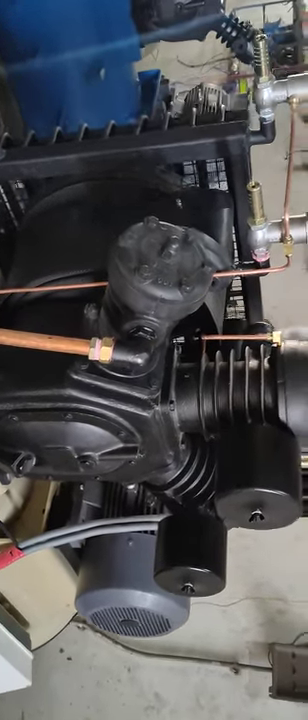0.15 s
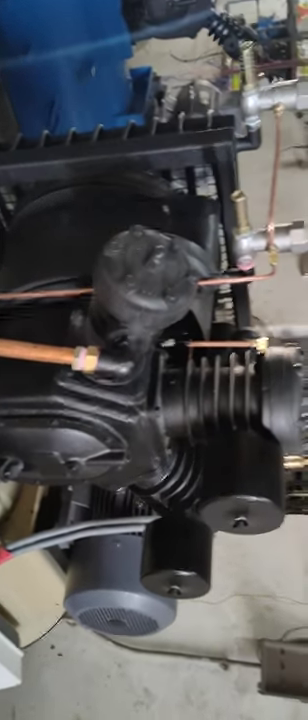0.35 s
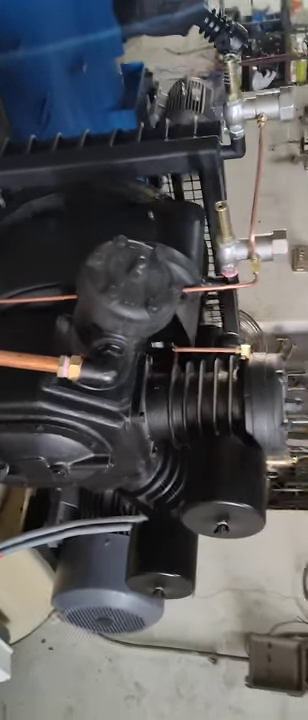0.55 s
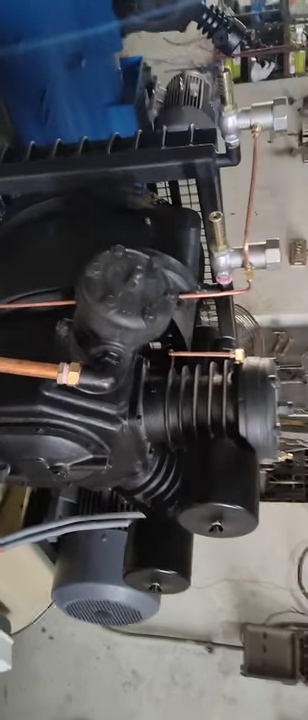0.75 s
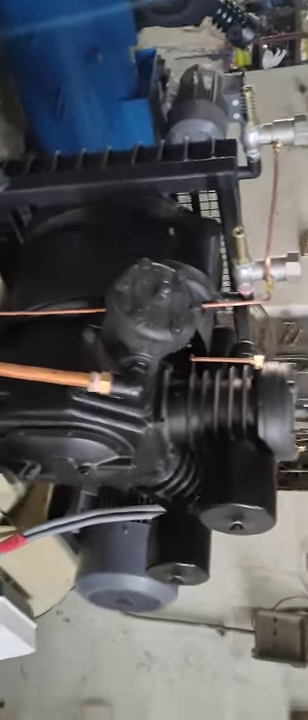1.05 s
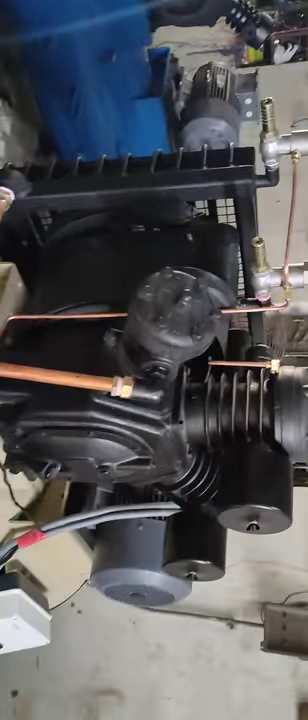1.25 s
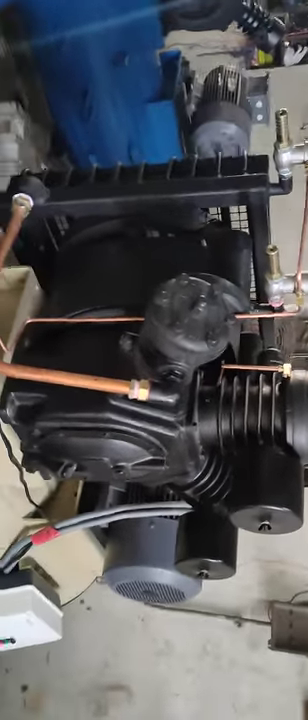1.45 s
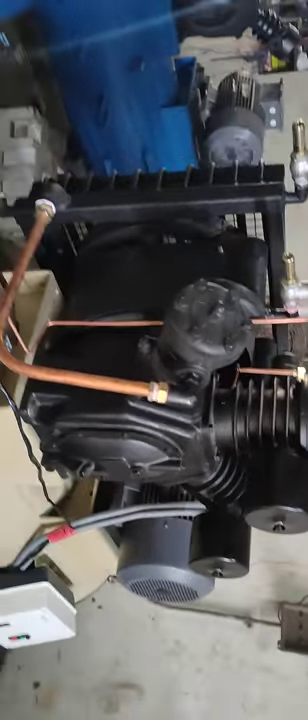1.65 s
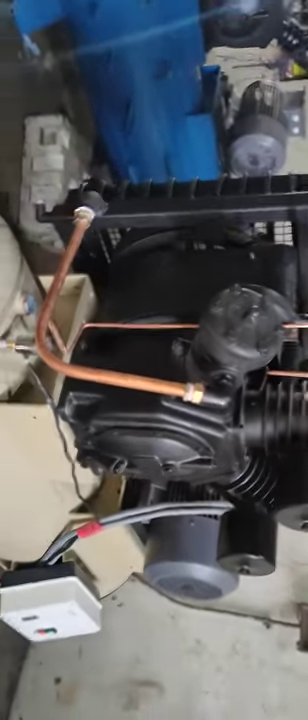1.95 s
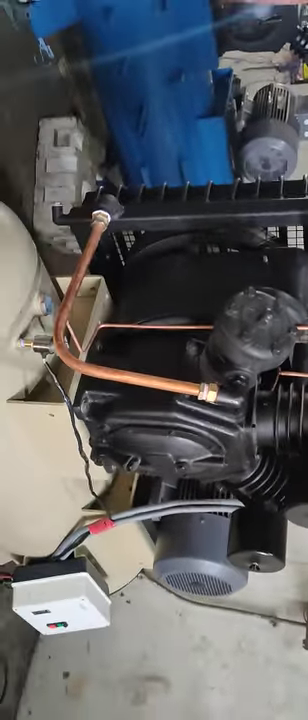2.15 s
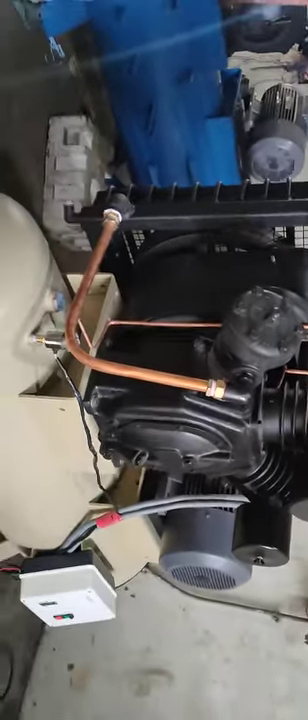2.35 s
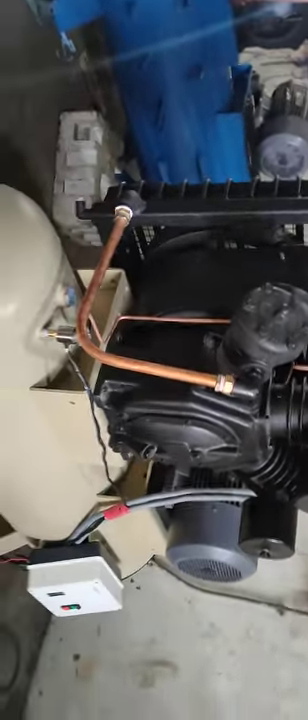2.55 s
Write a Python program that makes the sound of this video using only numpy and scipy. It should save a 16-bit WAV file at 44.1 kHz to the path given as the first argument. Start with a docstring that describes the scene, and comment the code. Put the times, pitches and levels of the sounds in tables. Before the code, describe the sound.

A piston air compressor runs steadily in a workshop, with a fast pulsing drone, metallic clatter and ticking valves. Halfway through, a steady, half-whistling hiss of air comes in. The microphone moves close over the machine.

```python
"""A workshop, where a belt-driven piston air compressor runs steadily, heard from a microphone moving
over its heads. Every turn of the crank repeats the rolling drone of the gulping intakes, the clatter of
the crankcase and the spit and tick of the valves. Early on, the clatter briefly turns raspy. Halfway
through, a steady, half-whistling hiss of rushing air comes in and half covers the valves."""
import sys
import numpy as np
from scipy.fft import rfft, irfft, next_fast_len
from scipy.io import wavfile
from scipy.ndimage import map_coordinates

SR = 44100
rng = np.random.default_rng(int(sys.argv[2]) if len(sys.argv) > 2 else 0)


def to_wav(s):
    """Save 16-bit WAV."""
    ch = np.atleast_2d(s).T  # columns
    pcm = np.round(np.clip(ch, -1, 1) * 32767)  # PCM
    wavfile.write(sys.argv[1], SR, pcm.astype(np.int16))


N = 119070
CRANK_HZ = 14.056


def crank(unsteady_turns):
    """Crank angle in turns; the belt lets it waver very slightly."""
    return np.arange(N) / SR * CRANK_HZ + unsteady_turns * wobble(4.6)


# When the microphone reaches each of its five positions, in seconds.
MIC_TIMES = [.3, .85, 1.4, 1.9, 2.45]
# The drone's harmonics. Each row: multiple of the crank rate, then level in dB at each position.
DRONE_HARMONICS = [(12, -61, -59, -60, -64, -68), (13, -63, -61, -62, -65, -65),
                   (19, -51, -48, -46, -48, -55), (22, -40, -38, -38, -40, -41),
                   (23, -34, -31, -31, -32, -36), (24, -41, -41, -40, -42, -47),
                   (25, -33, -33, -56, -48, -45), (26, -41, -41, -44, -44, -51),
                   (27, -49, -47, -53, -44, -51), (28, -41, -39, -39, -43, -51),
                   (29, -36, -40, -38, -35, -33), (30, -51, -43, -43, -43, -45),
                   (31, -39, -47, -45, -41, -39), (32, -38, -40, -44, -51, -44),
                   (42, -42, -43, -46, -47, -49), (43, -40, -39, -43, -48, -46),
                   (49, -41, -46, -51, -47, -46), (50, -44, -51, -37, -40, -52),
                   (51, -49, -45, -41, -42, -44), (53, -49, -43, -43, -56, -56),
                   (54, -45, -45, -50, -48, -47), (55, -45, -40, -48, -50, -56),
                   (56, -46, -56, -41, -46, -43), (61, -44, -47, -56, -51, -52),
                   (68, -50, -52, -54, -46, -53), (70, -46, -47, -45, -51, -49),
                   (77, -56, -47, -46, -48, -51), (85, -54, -49, -44, -45, -56)]
def intake_drone(turns, waver_db, intake_top_hz):
    """Intakes sound the low harmonics, the housing the high; the balance shifts as the microphone moves."""
    rows = np.array(DRONE_HARMONICS, float)
    multiples, gains = np.round(rows[:, 0]), amp(rows[:, 1:])
    intake = multiples * CRANK_HZ < intake_top_hz
    shifts = housing_phases(multiples, spread_rad=.9) + np.zeros(len(MIC_TIMES))
    shifts[intake] = gulping_phases(multiples[intake], gains[intake], count=200)
    out = np.zeros((2, N))
    for multiple, gain, shift in zip(multiples, gains, shifts):
        phase = 2 * np.pi * multiple * turns + curve(list(zip(MIC_TIMES, shift)))
        level = np.sqrt(2) * curve(list(zip(MIC_TIMES, gain))) * amp(waver_db * wobble(3.83))
        width = amp(along(STEREO_WIDTH, multiple * CRANK_HZ))
        side = width * rng.choice([-1, 1]) * np.sin(phase + .42 * wobble(.45))
        out += level * (np.cos(phase) + np.outer([1, -1], side))
    return out


# Gulps of air. Each row: crank angle in turns, strength at the first microphone position, at the last.
GULPS = [(.16, .8, .9), (.29, .75, .7), (.41, .55, .8), (.56, 1.25, .7), (.74, 1.6, 1), (.97, .75, 1.6)]
def gulping_phases(multiples, gains, count, gulp_turns=.052, rest=.3):
    """Random phases, nudged at each microphone position until the drone swells with the intakes' gulps."""
    turn = np.arange(count) / count
    waves = np.exp(2j * np.pi * np.outer(multiples, turn))
    candidates = rng.uniform(0, 2 * np.pi, (count, len(multiples)))
    path, score = [], 0
    for gain, moved in zip(gains.T, np.linspace(0, 1, len(MIC_TIMES))):
        gulps = rest
        for angle, first, last in GULPS:
            offset = (turn - angle + .5) % 1 - .5
            gulps = gulps + (first + moved * (last - first)) * bell(offset, gulp_turns)
        for _ in range(20):
            drone = gain * np.exp(1j * candidates) @ waves
            swelling = gulps * np.exp(1j * np.angle(drone))
            candidates = np.angle(swelling @ waves.conj().T)
        path.append(candidates)
        score = score + np.abs(drone) @ gulps
    return np.unwrap(np.array(path)[:, np.argmax(score)].T)


def housing_phases(multiples, spread_rad):
    """Neighbouring harmonics share one housing resonance, struck once a turn at its own crank angle."""
    resonance = np.cumsum(np.diff(multiples, prepend=multiples[0]) > 1)
    angle = rng.random(len(multiples))[resonance]
    return (rng.normal(0, spread_rad, len(multiples)) - 2 * np.pi * multiples * angle)[:, None]


# The body of the crankcase and fins. Each row: frequency in Hz, relative level in dB.
CASE_COLOUR = [(45, -42), (70, -26), (110, -24.5), (160, -20), (225, -24.5), (265, -8.5), (310, 6),
               (430, 4), (520, -3), (635, -1.5), (770, -1.5), (1050, -5.5), (1400, -8.5), (1560, -7.5),
               (1950, -11), (2700, -9), (3050, -15.5), (3550, -11.5), (4300, -23), (6000, -24),
               (16000, -42)]
# The clatter's fader. Each row: time in seconds, level in dB.
CASE_LEVEL = [(0, -26), (.7, -28), (1.2, -28.5), (2.7, -30)]
def crankcase(turns, split_hz, loose_db):
    """Pistons, rods and fins clatter alike each turn, more loosely in the treble."""
    low = lambda hz: 1 / np.sqrt(1 + (hz / split_hz) ** 4)
    between_harmonics = lambda hz: ~np.isin(np.round(hz / CRANK_HZ), np.array(DRONE_HARMONICS)[:, 0])
    repeating = filtered(rattle(turns, loose=0, drift=1.435), between_harmonics)
    bass = filtered(repeating + amp(loose_db) * rng.standard_normal((2, N)), low)
    treble = filtered(rattle(turns, loose=.44, drift=1.99), lambda hz: np.sqrt(1 - low(hz) ** 2))
    return amp(curve(CASE_LEVEL)) * radiate(bass + treble, lambda hz: along(CASE_COLOUR, hz) + metal(hz))


# The ring of fins and valve plates. Each row: frequency in Hz, width in Hz, boost in dB.
METAL_PEAKS = [(1565, 140, 4), (2747, 40, 7), (5380, 90, 5)]
def metal(hz):
    """Decibels that the metal's resonances add."""
    return sum(db / (1 + (2 * (hz - centre) / width) ** 2) for centre, width, db in METAL_PEAKS)


# The valves' rhythm. Each row: crank angle in turns, relative level in dB, decay in turns.
VALVE_STROKES = [(.514, -1, 0.08), (0.698, -2.5, 0.064), (.757, -3.5, 0.31)]
# The bright plates and ports, and the ringing passages. Each row: frequency in Hz, relative level in dB.
PLATE_COLOUR = [(400, -22), (1500, -3.5), (3400, 1.5), (4500, -26.5), (5350, 1), (5800, -36), (6800, 13.5),
                (7800, -29.5), (9200, -3.5), (10600, -12.5), (12000, -7), (13300, -1.5), (14200, -8),
                (15700, -14)]
PASSAGE_COLOUR = [(2000, -31), (4600, -16.5), (5900, -9.5), (6300, -4.5), (6650, -1.5), (7050, -0.5),
                  (7450, -5), (7900, -13), (11000, -22), (16000, -17.5)]
# Where the valves sit. Each row: frequency in Hz, left over right in dB.
VALVE_PAN = [(1000, -2), (2300, 4.5), (7000, 2), (13500, -2), (15000, -6)]
# The fader for spit and ring together. Each row: time in seconds, gain in dB.
VALVE_FADER = [(0, -32), (.3, -32), (1.2, -33), (1.6, -31.5), (2.7, -33)]
def valves(turns, scatter_db, passage_follows, passage_db=3, rest_db=-17, open_turns=.0021):
    """Each valve snaps open and spits air; the air passages ring with it and keep on between strokes."""
    power = amp(rest_db) ** 2
    for angle, db, decay in VALVE_STROKES:
        age = (turns - angle) % 1
        stroke = (1 - np.exp(-age / open_turns)) * np.exp(-age / decay)
        power = power + (amp(db + scatter_db * wobble(16.1)) * stroke) ** 2
    flow = np.sqrt(power)
    port_air = flow * rattle(turns, loose=.45, drift=2.34)
    passage_air = flow ** passage_follows * rattle(turns, loose=.7, drift=2)
    spit = radiate(port_air, lambda hz: along(PLATE_COLOUR, hz) + metal(hz), VALVE_PAN)
    ring = radiate(passage_air, lambda hz: along(PASSAGE_COLOUR, hz), VALVE_PAN)
    return amp(curve(VALVE_FADER)) * (spit + amp(passage_db) * ring)


# The tick's glassy top. Each row: frequency in Hz, relative level in dB.
TICK_COLOUR = [(200, -60), (2000, -9), (4500, -3), (6000, -12), (7800, -13), (11000, -16), (12000, -4),
               (12700, 5), (13100, 1), (13550, 6.5), (14200, -1), (15700, -7)]
# The tick's fader. Each row: time in seconds, level in dB.
TICK_LEVEL = [(0, -40.5), (1.3, -42), (1.8, -41)]
def valve_tick(turns, angle_turns, decay_turns):
    """The main valve plate hits its stop once a turn with a short bright ring."""
    age = (turns - angle_turns) % 1
    blow = np.exp(-age / decay_turns) * amp(wobble(13.6))
    burst = blow * rattle(turns, loose=.99, drift=1.7)
    return amp(curve(TICK_LEVEL)) * radiate(burst, lambda hz: along(TICK_COLOUR, hz), VALVE_PAN)


# The tone of the hiss. Each row: frequency in Hz, relative level in dB.
HISS_COLOUR = [(500, -40), (1200, 4), (2000, -2.5), (3500, 5.5), (4500, -3.5), (5600, 2), (6800, -1.5),
               (8500, 1.5), (9300, -4), (12000, -6), (14000, -4), (15700, -10)]
# Where the hiss sits. Each row: frequency in Hz, left over right in dB.
HISS_PAN = [(1000, -4), (2300, 6.5), (3500, -2), (5700, 3), (8200, 0), (9700, -2), (11200, -3), (13500, -4),
            (15700, -4)]
# The fade-in of the air, and an extra fader on its top band. Each row: time in seconds, gain in dB.
HISS_FADER = [(0, -49), (1.3, -41), (1.41, -30), (1.6, -25.5), (1.85, -25.5), (2.1, -24.5), (2.27, -25.5),
              (2.44, -22.5), (2.56, -23.5), (2.7, -25)]
HISS_TOP_FADER = [(1.4, 3.5), (1.8, 2.5), (2.1, 2), (2.25, -3), (2.34, 3), (2.45, 1.5), (2.7, 2)]
# Breathy whistles. Each row: pitch in Hz, half width in Hz, level against the hiss in dB,
# peak of the swell in seconds, its half length in seconds, its height in dB.
WHISTLES = [(2745, 66, -16, 2.1, .09, 5.5), (3030, 84, -10.5, 2.62, 0.027, 11),
            (3700, 140, -13, 2.17, 0.11, 4.5), (6950, 430, -4.5, 2.46, 0.15, 3),
            (8130, 160, -7, 1.76, .15, 3), (9900, 430, -15, 2.43, 0.091, 8),
            (11150, 190, -12.5, 2.42, 0.087, 4.5), (14800, 300, -14, 1.8, .14, 8)]
def rushing_air(flutter_db, flicker_db, trim_db=-1.5, top_hz=10900):
    """A turbulent hiss with flickering half-whistles, each swelling as the microphone crosses its beam."""
    air = radiate(rng.standard_normal((2, N)), lambda hz: along(HISS_COLOUR, hz), HISS_PAN)
    for centre, width, db, crossing, length, swell_db in WHISTLES:
        resonance = lambda hz: -20 * np.log10(1 + ((hz - centre) / width) ** 2)
        whistle = radiate(rng.standard_normal((2, N)), resonance, HISS_PAN)
        beam = bell(np.arange(N) / SR - crossing, length)
        air = air + amp(db + swell_db * beam + flicker_db * wobble(12)) * whistle
    top = filtered(air, lambda hz: np.clip((hz - top_hz) / 1000 + .5, 0, 1))
    level = amp(trim_db + curve(HISS_FADER) + flutter_db * wobble(45))
    return level * (air - top + amp(curve(HISS_TOP_FADER)) * top)


def rasp(turns, peak_s, half_length_s, centre_hz, half_width_hz, db):
    """The clatter briefly turns raspy."""
    colour = lambda hz: -10 * np.log10(1 + ((hz - centre_hz) / half_width_hz) ** 4)
    band = radiate(rattle(turns, loose=.6, drift=2), colour)
    return amp(db) * bell(np.arange(N) / SR - peak_s, half_length_s) * band


def reflections(x, count, each_db=-10.5, latest_s=.03):
    """The guard, tank and floor send back a few early reflections, different for each channel."""
    delays = rng.uniform(0, latest_s, (count, 2, 1))
    comb = lambda hz: 1 + amp(each_db) * np.exp(-2j * np.pi * delays * hz).sum(0)
    return filtered(x, comb) / np.sqrt(1 + count * amp(each_db) ** 2)


def rattle(turns, loose, drift):
    """Noise that repeats each turn, renewed drift times a second; its loose share never repeats."""
    patterns = rng.standard_normal((2, 16, int(SR / CRANK_HZ)))
    where = [1 + np.arange(N) / SR * drift, turns % 1 * patterns.shape[-1]]
    cycle = np.array([map_coordinates(p, where, mode="grid-wrap") for p in patterns])
    return np.sqrt(1 - loose) * unit(cycle) + np.sqrt(loose) * rng.standard_normal((2, N))


# The width of the image. Each row: frequency in Hz, side against mid in dB.
STEREO_WIDTH = [(170, -25), (350, -10.5), (700, -6.5), (1400, -0.5), (2500, 0)]
def radiate(pair, colour, pan=None):
    """Two unrelated signals become a coloured stereo sound of rms 1, near mono in the bass."""
    spread = lambda hz: np.array([np.ones_like(hz), amp(along(STEREO_WIDTH, hz))])
    mid, side = filtered(pair, lambda hz: amp(colour(hz)) * spread(hz))
    both = np.array([mid + side, mid - side])
    if pan is not None:
        both = filtered(both, lambda hz: amp(np.outer([.5, -.5], along(pan, hz))))
    return unit(both)


def amp(db):
    """Decibels to gain."""
    return 10 ** (np.asarray(db) / 20)


def unit(x):
    """Scale to rms 1."""
    return x / np.sqrt(np.mean(x ** 2) + 1e-20)


def bell(offset, half_width):
    """A smooth swell, 1 at offset zero."""
    return np.exp(-(offset / half_width) ** 2)


def along(points, hz):
    """(Hz, value) points read on a log axis."""
    knots, values = np.transpose(points)
    return np.interp(np.log(hz + 1), np.log(knots + 1), values)


def curve(points):
    """(s, value) points, one value per sample."""
    return np.interp(np.arange(N) / SR, *np.transpose(points))


def wobble(rate):
    """A smooth random curve, rate knots a second."""
    return map_coordinates(rng.standard_normal(256), [np.arange(N) * rate / SR], mode="wrap")


def filtered(x, response):
    """x through a frequency response."""
    size = next_fast_len(N + SR // 2)
    return irfft(rfft(x, size) * response(np.fft.rfftfreq(size, 1 / SR)), size)[..., :N]


def scene():
    """One crank drives the drone, the clatter and the valves; the air rushes in over them."""
    turns = crank(unsteady_turns=.00071)
    strokes = valves(turns, scatter_db=2.35, passage_follows=.47)
    air = reflections(rushing_air(flutter_db=.5, flicker_db=1), count=6)
    drone = intake_drone(turns, waver_db=.5, intake_top_hz=480)
    clatter = crankcase(turns, split_hz=1200, loose_db=-4.5)
    ticks = valve_tick(turns, angle_turns=.698, decay_turns=.04)
    grit = rasp(turns, peak_s=.316, half_length_s=.076, centre_hz=1900, half_width_hz=390, db=-34.5)
    return drone + clatter + strokes + ticks + grit + air


def record(dry):
    """A hard high cut takes off the very top."""
    return filtered(dry, lambda hz: hz < 15850)


dry = scene()
out = record(dry)
to_wav(out)
```